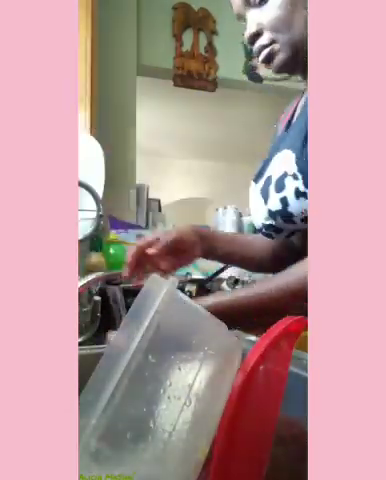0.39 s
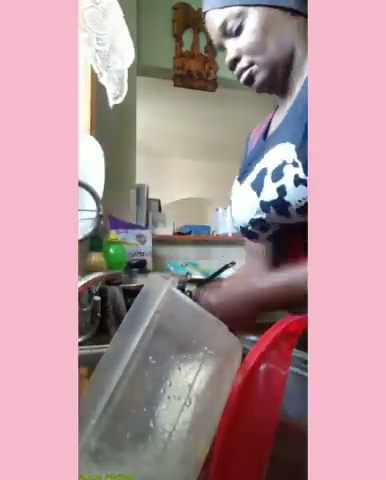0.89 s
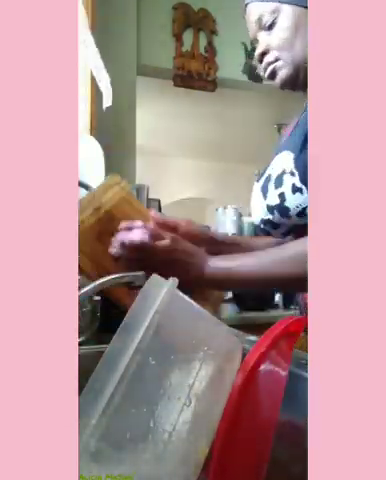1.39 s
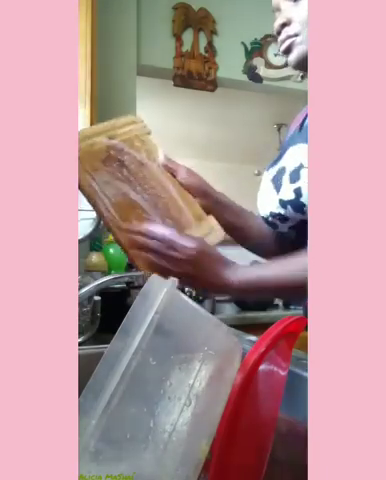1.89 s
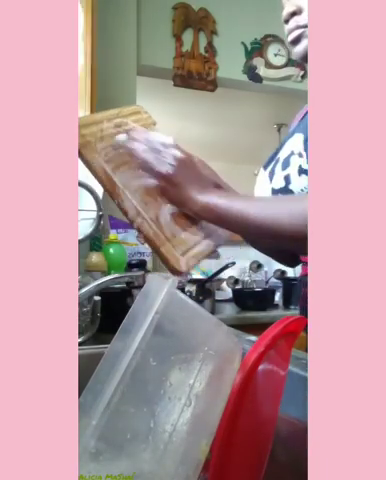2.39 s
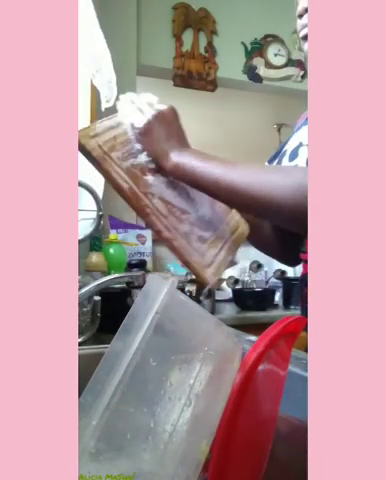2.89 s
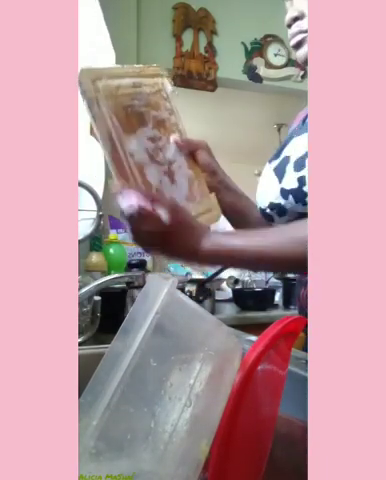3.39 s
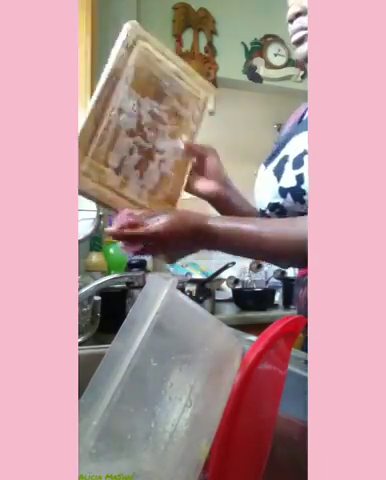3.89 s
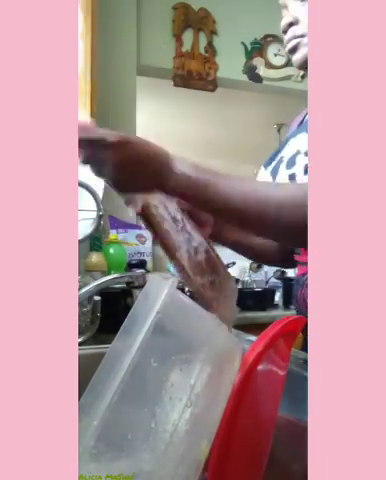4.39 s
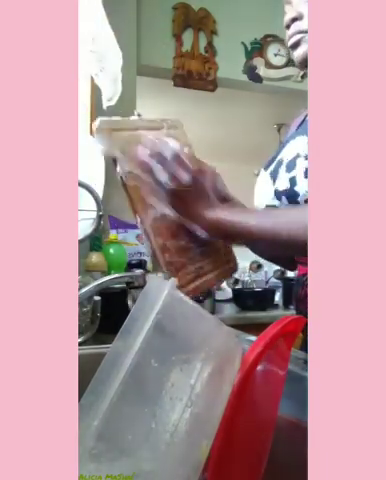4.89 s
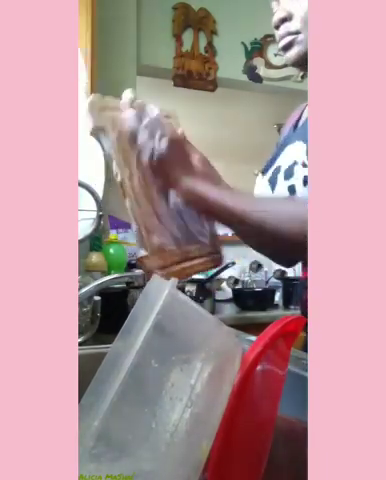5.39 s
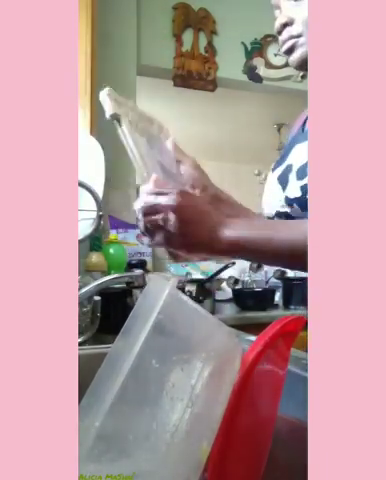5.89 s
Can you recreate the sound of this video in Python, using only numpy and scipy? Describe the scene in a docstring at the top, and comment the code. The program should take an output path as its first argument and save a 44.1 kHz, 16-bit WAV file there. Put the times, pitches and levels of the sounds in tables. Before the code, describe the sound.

Wet, fizzy scrubbing of a soapy board over a running kitchen tap, with dull worktop knocks at the start and a boomy basin thump.

```python
"""Scrubbing a soapy board

A soapy board is scrubbed over a kitchen sink while the tap runs; early on things knock the worktop and the basin.
The left microphone port is pressed against the worktop and hears its dull vibration: struck and shaken modes.
The right port is open to the air and hears hiss, suds and splashes, with a treble peak near 10 kHz:
shaped noise, popping bubbles and short ringing bursts. Knocks on the basin reach both ports."""
import sys
import numpy as np
from scipy import signal
from scipy.fft import rfft, irfft
from scipy.io import wavfile

SR = 44100
rng = np.random.default_rng(int(sys.argv[2]) if len(sys.argv) > 2 else 0)


def gain_from_db(level_db):
    """Turn a decibel level (scalar or array-like) into a linear amplitude factor."""
    decades = np.asarray(level_db, float) / 20
    return 10 ** decades


def waveform_to_disk(signal):
    """Save audio, clipped to [-1, 1], as 16-bit WAV at the path in sys.argv[1]."""
    frames = np.transpose(np.atleast_2d(signal))
    scaled = np.clip(frames, -1, 1) * 32767
    samples = np.round(scaled).astype(np.int16)
    wavfile.write(sys.argv[1], SR, samples)


N = 265041

# Modes of the worktop. Each row: frequency in Hz, longest t60 in s, relative level when shaken in dB,
# relative level when struck in dB.
WORKTOP_MODES = [(142, 0.45, -16.5, -50), (154.3, 0.4, -8, -1), (186.2, 0.75, 5.5, -3),
                 (187, 0.82, -10, -19), (272.8, 0.13, -5.5, -10), (297, 0.1, -29, -9),
                 (344, 0.11, -40, -8.5), (374, 0.19, -43, -13.5), (409.4, 0.15, -20, -14.5),
                 (458.4, 0.081, 4, -53.5), (695.4, 0.5, 4.5, -36), (835.4, 0.1, 1, -63),
                 (960, 0.42, -8.5, -46), (1398, 0.082, -11.5, -75), (1924, 0.17, -17, -43)]
# Knocks on the worktop. Each row: start in seconds, relative level in dB, hardness in Hz,
# share of the long hollow ring in dB.
WORKTOP_BLOWS = [(.001, -16.5, 300, -5), (.023, -6.5, 655, -20.5), (.046, -13.5, 500, 6.5),
                 (0.0839, -12, 500, 2.5), (.128, -23.5, 450, -10), (.165, -27.5, 400, -6),
                 (.363, -29.5, 450, -5)]
# Heavier shoves of the scrubbing body against the worktop. Each row: middle of the swell in seconds,
# length in seconds, level of the modes under 170 Hz in dB, level of those from 170 to 400 Hz in dB.
BODY_SHOVES = [(1.14, 0.85, -40.5, -55), (1.62, 0.19, -44.5, -45), (1.78, 0.07, -41, -37),
               (1.96, 0.03, -44, -33), (2.15, 0.029, -41.5, -59), (2.26, 0.093, -34.5, -56),
               (2.39, 0.079, -39.5, -45), (2.74, 0.3, -65, -49), (2.82, 0.017, -51, -36),
               (3.04, 0.3, -56, -42), (3.56, 0.22, -50, -41.5), (3.82, 0.35, -52, -37),
               (4.12, 0.31, -69, -37.5), (4.33, 0.13, -51, -43.5), (4.55, 0.24, -49.5, -38),
               (5.04, 0.24, -52, -43), (5.2, 0.21, -37, -34.5), (5.36, 0.071, -37.5, -42),
               (5.46, 0.21, -47, -44), (5.88, 0.25, -33, -38.5)]
# Swells of the worktop hum above 400 Hz. Each row: middle of the swell in seconds, length in seconds, level in dB.
UPPER_SWELLS = [(.39, 0.17, -50), (1.11, 0.74, -50.5), (2.4, 0.11, -51), (3.0, 0.17, -51),
                (5.33, 0.052, -48)]
# Noise floor of the covered port. Each row: frequency in Hz, density in dB per Hz before an 11 dB cut.
COVERED_NOISE = [(25, -101), (60, -62), (100, -83), (230, -64.5), (350, -72), (580, -76), (1100, -102),
                 (1700, -113), (2700, -117), (5500, -123), (8500, -124), (13000, -118), (15500, -122)]
# Noise floor of the open port. Each row: frequency in Hz, density in dB per Hz before the low cut.
OPEN_NOISE = [(25, -100), (60, -26.5), (120, -46), (230, -74.5), (330, -81), (400, -93.5), (495, -82),
              (600, -96.5), (780, -84.5), (950, -89.5), (1150, -107.5)]
# Spectrum of the spray. Each row: frequency in Hz, relative density in dB per Hz.
SPRAY_SPECTRUM = [(590, -35), (1000, -23), (1220, -13), (1730, -5), (1880, -4), (2180, 0), (2750, -6.5),
                  (3740, -4.5), (4500, -7.5), (6420, -5), (9700, -4), (11800, -13.5), (12600, -21),
                  (15500, -30.5)]
# Steady stream from the tap. Each row: frequency in Hz, relative density in dB per Hz.
STREAM_SPECTRUM = [(590, -44), (1000, -9), (1660, -9), (1880, -7), (2260, -33), (5340, -17), (5590, -8.5),
                   (7620, -24), (10000, 1), (15500, -16.5)]
# Hollows of tub, board and basin that colour the splash. Each row: frequency in Hz, width in Hz,
# relative level in dB.
HOLLOW_RINGS = [(1794, 59, 11), (5470, 130, 4.5)]
# How much water and suds are moving. Each row: time in seconds, then relative levels in dB of
# slosh (below 2.85 kHz), splash (2.9-6 kHz) and fizz (above 9.73 kHz).
WATER_MOTION = [(0, -63.5, -64.5, -61), (.2, -70.5, -70.5, -58), (.62, -73, -63.5, -61),
                (.87, -69, -59.5, -51), (.92, -69, -54.5, -45), (.97, -60, -45.5, -47.5),
                (1.05, -48, -60, -49), (1.11, -60, -59, -49.5), (1.21, -71, -67, -52),
                (1.26, -68, -53.5, -45), (1.36, -60, -50, -49.5), (1.5, -59.5, -50.5, -50.5),
                (1.55, -55, -44, -41.5), (2.0, -49.5, -45.5, -40.5), (2.4, -52, -46.5, -40.5),
                (2.56, -52.5, -50.5, -45), (2.65, -62, -55.5, -53), (2.9, -62, -51, -49),
                (3.8, -63, -54, -55.5), (4.15, -72, -59.5, -54.5), (4.42, -85, -56, -51.5),
                (4.68, -59, -53.5, -50), (4.79, -52.5, -49, -51), (5.5, -57, -53, -48.5),
                (5.62, -61.5, -56.5, -48), (5.75, -55, -52, -48.5), (5.9, -65, -58.5, -58),
                (6.0, -73, -62, -59)]
# Handfuls of suds squeezed or slapped on the board. Each row: middle of the swell in seconds,
# length in seconds, relative levels in dB of slosh, splash and fizz.
SUDS_SLOPS = [(.31, 0.15, -86, -84, -48.5), (.53, 0.16, -68, -67, -48.5), (.7, 0.043, -66, -54, -48),
              (.84, 0.059, -78, -66, -45.5), (1.02, 0.13, -59, -48, -49), (1.27, 0.1, -74, -63, -57),
              (1.32, 0.12, -49, -52, -49), (1.46, 0.061, -51, -47.5, -54), (1.86, 0.16, -47.5, -41, -41),
              (2.47, 0.072, -48, -46, -58), (2.87, 0.083, -57, -48, -52), (3.13, 0.16, -57, -66, -47.5),
              (3.27, 0.095, -58, -62, -49), (3.34, 0.098, -51.5, -66, -49), (3.44, 0.072, -67, -46.5, -64),
              (3.58, 0.15, -61, -49, -48), (3.74, 0.21, -61, -45.5, -48), (3.845, 0.16, -62, -52, -42.5),
              (4.05, 0.37, -63.5, -55, -74), (4.52, 0.34, -60, -56, -71), (4.89, 0.064, -76, -70, -63),
              (5.2, 0.1, -73, -73, -46), (5.28, 0.084, -48.5, -50, -53), (5.41, 0.23, -60, -73, -45.5),
              (5.52, 0.14, -48.5, -53.5, -67), (5.69, 0.09, -54, -61, -47), (5.83, 0.14, -56.5, -52.5, -58),
              (5.94, 0.029, -76, -75, -50)]
# Low rumble around the basin. Each row: middle of the swell in seconds, length in seconds, level in dB.
BASIN_RUMBLES = [(0, 0.28, -40), (.22, 0.32, -48.5), (.74, 0.3, -33.5), (1.13, 0.43, -52),
                 (3.4, 0.37, -48.5), (5.86, 0.16, -58)]
# Modes of the basin. Each row: frequency in Hz, t60 in s, relative level left in dB, relative level right in dB.
BASIN_MODES = [(93, 0.05, -24, -25), (122.9, 0.99, -27, -45), (128.8, 0.57, -4.5, -40),
               (135, 0.13, -13, -23), (148, 0.17, -13, -4.5), (170, 0.17, -10, -15),
               (249.5, 0.13, -13, -43), (290, 0.069, -2.5, -16), (312, 0.077, -34, -22),
               (337, 0.06, -40, -28), (418, 0.2, -17.5, -37), (480, 0.22, -33, -26), (551, 0.2, -21.5, -43),
               (715, 0.28, -31, -46), (778, 0.047, -16, -28), (838, 0.039, -44, -14),
               (1330, 0.0074, -47, -12)]
# Knocks on the basin. Each row: start in seconds, relative level left in dB, relative level right in dB,
# hardness in Hz, share of the boom in dB.
BASIN_BLOWS = [(0.693, -13.5, -12, 560, -26), (.719, -21, -20, 800, -5.5), (.742, -29, -38, 600, -17),
               (0.764, -14.5, -46, 700, 11.5), (0.767, -7.5, -6.5, 1140, -5.5), (.845, -33, -37, 600, -14),
               (.885, -38, -33, 600, -6), (1.041, -38, -37, 1480, 2), (1.113, -29.5, -40, 1500, -3)]
# Single splats. Each row: start in seconds, relative level in dB, ring in Hz, tail time constant in s.
SPLAT_EVENTS = [(0.905, -44, 9000, 0.033), (1.0125, -40, 8500, 0.025), (1.043, -41.5, 9800, 0.027),
                (1.2517, -37, 10800, 0.032), (1.628, -51, 9900, .03), (1.795, -51, 9900, .03),
                (1.856, -38, 9900, 0.027), (2.045, -39, 9900, .03), (2.089, -42, 9900, .03),
                (2.4606, -39, 9800, 0.028), (2.853, -40.5, 10300, 0.017), (3.099, -42.5, 9100, .035),
                (3.2483, -45, 9800, .02), (3.733, -41, 10100, 0.022), (3.8278, -38.5, 10500, 0.043),
                (3.9225, -42.5, 9900, 0.034), (4.348, -50, 9900, .012), (4.526, -46, 9600, 0.017),
                (4.734, -45.5, 9800, .015), (4.8734, -39.5, 10500, 0.048), (5.085, -44, 9300, .015),
                (5.172, -44, 10100, 0.028), (5.291, -41, 9900, 0.023), (5.402, -43, 10300, .04),
                (5.685, -51, 10200, .02)]
# Single bubbles plinking. Each row: start in seconds, relative level in dB, starting pitch in Hz.
BUBBLE_PLINKS = [(0.9751, -35, 2140), (1.0096, -31, 2440), (1.036, -32, 2290), (1.2494, -37, 3080),
                 (1.279, -31.5, 2610), (1.2994, -33, 2610), (1.3684, -30, 3670), (1.849, -27, 3700),
                 (3.1194, -40, 1780), (3.5922, -31.5, 2640), (5.2759, -47, 2430)]
# Brief hollow tones of water in a cavity. Each row: start in seconds, length in seconds, start pitch in Hz,
# end pitch in Hz, level in dB before the fades.
CAVITY_GURGLES = [(1.03, 0.11, 481, 563.5, -57), (1.361, 0.6, 969, 942, -55.5),
                  (3.89, 0.031, 870, 960, -50.5), (5.1, 0.17, 796, 860, -54), (5.636, 0.101, 730, 797, -53),
                  (5.896, 0.086, 1070, 1115, -58.5)]
# Something dragged over the worktop. Each row: middle of the swell in seconds, length in seconds, level in dB.
WORKTOP_DRAGS = [(1.06, 0.071, -41), (1.12, 0.15, -42), (1.185, 0.063, -45.5)]

# Resting worktop: low shake from scrubbing, upper hum from running water
SHAKE_DB, HUM_DB, HUM_WANDER_DB = -51, -55, 3
HAND_LANDS_S = 0.424
STREAM_DB, WASH_FLICKER_DB, WASH_FLICKER_HZ = -55, 0.87, 36
RUMBLE_DB = -76
SPLAT_RISE_S, SPLAT_TOP_HZ = 0.0016, 12100
DRAG_HZ, DRAG_T60_S = 675, 0.11


def rms_one(x):
    """Scale to unit rms."""
    return x / np.sqrt(np.mean(x ** 2) + 1e-20)


def in_time(rows):
    """Each column after the first as a curve over all samples."""
    s, *columns = np.transpose(rows)
    return [np.interp(np.arange(N) / SR, s, c) for c in columns]


def split(x, hz, side):
    """Steep low- or high-pass."""
    return signal.sosfilt(signal.butter(4, hz, side, fs=SR, output="sos"), x)


def colour(x, spectrum, end_db=-150):
    """Shape steady noise of unit rms to a density in dB per Hz."""
    hz, db = np.transpose(spectrum)
    grid = np.maximum(np.fft.rfftfreq(N, 1 / SR), 1)
    shape = gain_from_db(np.interp(np.log(grid), np.log(hz), db, left=end_db, right=end_db))
    return irfft(rfft(x) * shape, N) * np.sqrt(SR / 2)


def drift(rate_hz):
    """Slow chance with spread 1: noise smoothed by two equal poles, drawn every 40 samples."""
    r = np.exp(-80 * np.pi * rate_hz / SR)
    noise = rng.standard_normal(N // 40 + 2002)
    slow = signal.lfilter([1], [1, -2 * r, r * r], noise)[2000:]  # skip the start-up
    return np.interp(np.arange(N) / 40, np.arange(len(slow)), rms_one(slow))


def swells(rows, *resting_db):
    """Gains that rest at a level and swell smoothly around the middle of each event; powers add."""
    t = np.arange(N) / SR
    power = [gain_from_db(db) ** 2 + 0 * t for db in resting_db]
    for middle_s, length_s, *levels_db in rows:
        bump = np.cos(np.pi * np.clip((t - middle_s) / length_s, -.5, .5)) ** 4
        power = [p + gain_from_db(db) ** 2 * bump for p, db in zip(power, levels_db)]
    return np.sqrt(power)


def ring(force, hz, t60):
    """A two-pole resonator: a unit click sets a dying sine of starting height 1 ringing."""
    r, w = gain_from_db(-60 / (t60 * SR)), 2 * np.pi * hz / SR
    return signal.lfilter([0, np.sin(w)], [1, -2 * r * np.cos(w), r * r], force + 1e-18)


def blows(times, levels_db, hardness_hz):
    """Contact force: a smooth push, shorter when harder, then a dying rattle of loose things; no net shove."""
    force, t = np.zeros(N), np.arange(6000) / SR
    noise = rng.standard_normal((len(times), len(t)))
    for s, db, hz, rattle in zip(times, levels_db, hardness_hz, noise):
        push = t * np.exp(-2 * np.pi * hz * t)
        contact = push / push.sum() + gain_from_db(-40.0) * rattle * np.exp(-t / 0.051)
        start = round(s * SR)
        force[start:start + len(t)] += gain_from_db(db) * contact
    return split(split(force, 120, "high"), 5200, "low")


def thud(force, top_hz, t60, db):
    """The many small unresolved modes of a body: a dull, dying noise after each blow."""
    t = np.arange(N // 8) / SR
    cloud = rms_one(split(rng.standard_normal(len(t)), top_hz, "low")) * gain_from_db(-60 * t / t60)
    return gain_from_db(db) * signal.fftconvolve(force, cloud)[:N]


def worktop():
    """Scrubbing drives the low modes, running water the upper ones; a hand stills the ring of the knocks."""
    deep, shake = swells(BODY_SHOVES, SHAKE_DB, SHAKE_DB)
    drone, = swells(UPPER_SWELLS, HUM_DB + HUM_WANDER_DB * drift(19.0))
    s, db, hardness_hz, hollow_db = np.transpose(WORKTOP_BLOWS)
    force = blows(s, db, hardness_hz)
    hollow = blows(s, db + hollow_db, hardness_hz)
    struck = thud(split(force, 340, "low"), 346, 0.2, -12) + thud(force, 890, 0.21, -54)
    jolts = rng.standard_normal((2, N)) * gain_from_db(1.7 * drift(25.6))
    groups = np.zeros((3, N))  # modes under 170 Hz, from 170 to 400 Hz, and above
    for k, (hz, t60, shaken_db, struck_db) in enumerate(WORKTOP_MODES):
        push = hollow if 170 < hz < 200 else force
        struck = struck + gain_from_db(struck_db) * ring(push, hz, t60)
        # suds and pressing hands damp the long rings
        damped_t60 = min(t60, 28 / hz ** 0.87)
        groups[np.searchsorted([170, 400], hz)] += gain_from_db(shaken_db) * rms_one(ring(jolts[k % 2], hz, damped_t60))
    stilled = np.exp(-np.maximum(np.arange(N) / SR - HAND_LANDS_S, 0) / 0.0052)
    knocks = (split(struck, 423, "low") + gain_from_db(-11.5) * struck) * stilled
    low = deep * rms_one(split(groups[0], 44, "high"))
    middle = shake * rms_one(split(split(groups[1], 73, "high"), 460, "low"))
    upper = drone * rms_one(split(groups[2], 1950, "low"))
    return knocks + low + middle + upper


def patchy(shared_db, own_db):
    """Flat noise whose third-octave bands swell together and alone."""
    out, together = 0, shared_db * drift(18)
    edges = 900 * 2 ** np.arange(0, 4.4, 1 / 3)
    white = rng.standard_normal((2, N))
    for k, (low, high) in enumerate(zip(edges, edges[1:])):
        band = signal.sosfilt(signal.butter(2, [low, high], "band", fs=SR, output="sos"), white[k % 2])
        out = out + band * gain_from_db(together + own_db * drift(19.0))
    return rms_one(out)


def bubbles(per_s, cycles):
    """Suds pop at random, in clumps, each ringing some cycles at its own pitch; flat in density."""
    sizes = gain_from_db(3.5 * np.minimum(rng.exponential(1, N), 3.5)) * rng.choice([-1, 1], N)
    born = rng.random(N) < per_s * gain_from_db(3.0 * drift(14)) / SR
    pitches, dealt = np.geomspace(1300, 14000, 24), rng.integers(0, 24, N)
    out = 0
    for k, hz in enumerate(pitches):
        pops = sizes * born * (dealt == k)
        out = out + np.sqrt(hz) * rms_one(ring(pops, hz, cycles / hz))
    return rms_one(out)


def close_echoes(x, decay_s):
    """Dense reflections off nearby dishes and walls comb the spectrum; the pattern shifts as hands move."""
    t = np.arange(1500) / SR
    shares = np.array([drift(2.5) for _ in range(4)])
    shares /= np.sqrt((shares ** 2).sum(axis=0))
    paths = []
    for _ in range(4):
        echo = rng.standard_normal(len(t)) * np.exp(-t / decay_s)
        paths.append(signal.fftconvolve(x, echo)[:N])
    return rms_one(x + 0.8 * rms_one((shares * paths).sum(axis=0)))


def water():
    """Spray hiss with popping suds, ringing in hollows; slosh, splash and fizz swell apart over the steady stream."""
    resting = in_time(WATER_MOTION) + WASH_FLICKER_DB * drift(WASH_FLICKER_HZ)
    slosh, splash, fizz = swells(SUDS_SLOPS, *resting)
    flat = patchy(0.38, 1.73) + gain_from_db(-8.0) * bubbles(900, 38)
    for hz, width_hz, db in HOLLOW_RINGS:
        t60 = np.log(1000) / (np.pi * width_hz)
        flat = flat + gain_from_db(db - 30.5 + 1.5 * drift(2.0)) * rms_one(ring(flat, hz, t60))
    spray = colour(close_echoes(flat, 0.0043), SPRAY_SPECTRUM)
    stream = colour(close_echoes(rng.standard_normal(N), 0.0021), STREAM_SPECTRUM)
    low = slosh * rms_one(split(spray, 2850, "low"))
    middle = splash * rms_one(split(split(spray, 2900, "high"), 6000, "low"))
    high = fizz * rms_one(split(spray, 9730, "high"))
    return low + middle + high + gain_from_db(STREAM_DB) * rms_one(stream)


def rumble():
    """Lumpy low noise around the basin's boom."""
    lumps = rng.standard_normal(N) * gain_from_db(3.0 * drift(15))
    boom = split(split(ring(lumps, 115, 0.1), 430, "low"), 33.0, "high")
    return swells(BASIN_RUMBLES, RUMBLE_DB)[0] * rms_one(boom)


def basin():
    """Knocks ring the basin modes, through the worktop on the left and the air on the right."""
    s, left_db, right_db, hardness_hz, boom_db = np.transpose(BASIN_BLOWS)
    forces = np.array([blows(s, db, hardness_hz) for db in (left_db, right_db)])
    # each blow stirs the boom by its own share
    booms = np.array([blows(s, db + boom_db, hardness_hz) for db in (left_db, right_db)])
    modes = np.zeros((2, N))
    for hz, t60, *sides_db in BASIN_MODES:
        push = booms if hz < 143 or 400 < hz < 440 else forces
        modes += gain_from_db(sides_db)[:, None] * ring(push, hz, t60)
    dull = [thud(forces[0], 397, 0.25, -20.0), thud(forces[1], 380, 0.3, -31)]
    bright = [thud(forces[0], 1600, 0.07, -44), thud(forces[1], 1340, 0.07, -35)]
    return modes + dull + bright


def splats():
    """A sudden burst of noise that dies fast, coloured by one broad ring."""
    out, t = np.zeros(N), np.arange(5000) / SR
    noise = rng.standard_normal((len(SPLAT_EVENTS), len(t)))
    for (s, db, hz, tail_s), burst in zip(SPLAT_EVENTS, noise):
        tone = rms_one(ring(burst, hz, 12 / hz)) + 0.08 * split(burst, 5900, "high")
        shape = (1 - np.exp(-t / SPLAT_RISE_S)) * (np.exp(-t / 0.0069) + np.exp(-t / tail_s))
        start = round(s * SR)
        out[start:start + len(t)] += gain_from_db(db) * tone * shape
    return split(out, SPLAT_TOP_HZ, "low")


def plinks():
    """Each bubble rings as a short, ragged sine that rises a little in pitch."""
    out, t = np.zeros(N), np.arange(2600) / SR
    for s, db, hz in BUBBLE_PLINKS:
        ragged = 1 + 3 * split(rng.standard_normal(len(t)), 600, "low")
        swell = (1 - np.exp(-t / 0.00067)) * np.exp(-t / 0.003) * ragged
        start = round(s * SR)
        out[start:start + len(t)] += gain_from_db(db) * swell * np.sin(2 * np.pi * hz * (t + t ** 2))
    return out


def gurgles():
    """A narrow band of noise gliding in pitch, swelling and fading."""
    out = np.zeros(N)
    for s, length_s, start_hz, end_hz, db in CAVITY_GURGLES:
        start, count = round(s * SR), round(length_s * SR)
        wobble = split(rng.standard_normal((2, N // 4)), start_hz * 0.039, "low")[:, -count:]
        phase = 2 * np.pi * np.cumsum(np.linspace(start_hz, end_hz, count)) / SR
        band = rms_one(wobble[0] * np.cos(phase) + wobble[1] * np.sin(phase))
        tone = band * np.hanning(count) ** 0.26
        out[start:start + count] += gain_from_db(db) * tone[:N - start]
    return out


def drags():
    """Rough friction noise makes one upper worktop mode sing."""
    friction = rng.standard_normal(N)
    return swells(WORKTOP_DRAGS, -79.0)[0] * rms_one(ring(friction, DRAG_HZ, DRAG_T60_S))


def scene():
    """Left port covered by the worktop, right port open to the air; their noise floors share a little."""
    shared, own = rng.standard_normal(N), rng.standard_normal((2, N))
    covered = colour(rms_one(own[0] + 0.11 * shared), COVERED_NOISE) * gain_from_db(-11.0)
    air = split(colour(rms_one(own[1] + 0.14 * shared), OPEN_NOISE), 330, "high")
    left = worktop() + drags() + covered
    right = gain_from_db(2.0) * (water() + splats() + plinks()) + gurgles() + rumble() + air
    return np.array([left, right]) + basin()


def band_limit(x):
    """A steep low-pass at the top of the band."""
    return signal.sosfilt(signal.butter(12, 15680, fs=SR, output="sos"), x)


def record(dry):
    """Hands on the finished mix of the two ports."""
    return band_limit(dry)


dry = scene()
out = record(dry)
waveform_to_disk(out)
```